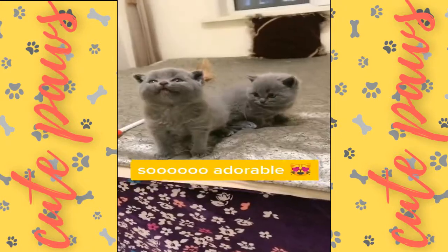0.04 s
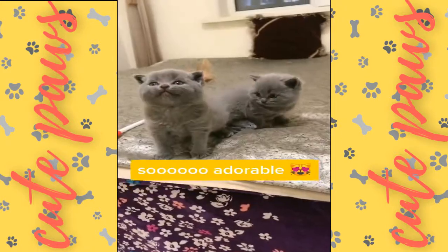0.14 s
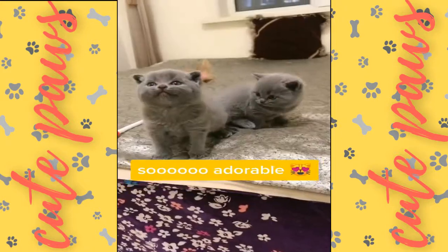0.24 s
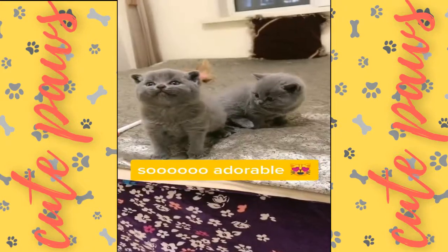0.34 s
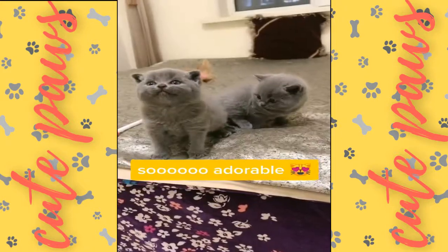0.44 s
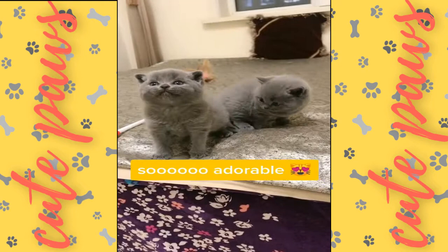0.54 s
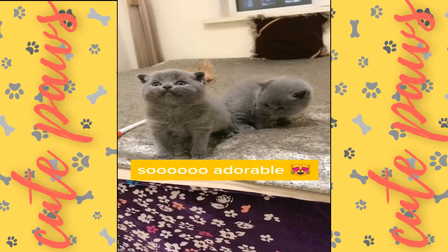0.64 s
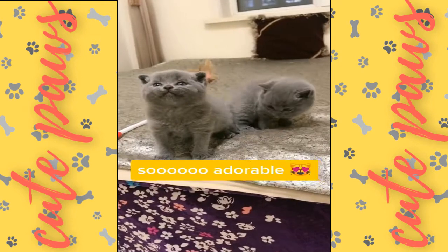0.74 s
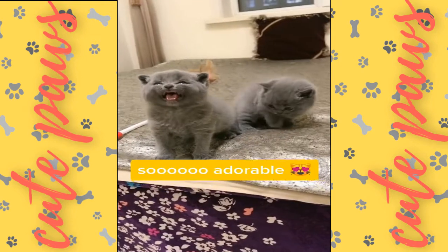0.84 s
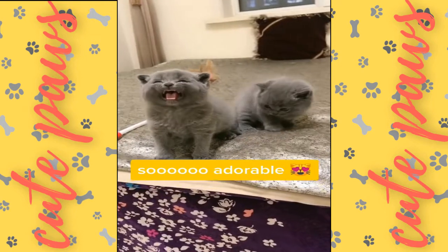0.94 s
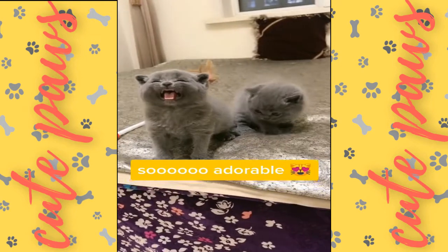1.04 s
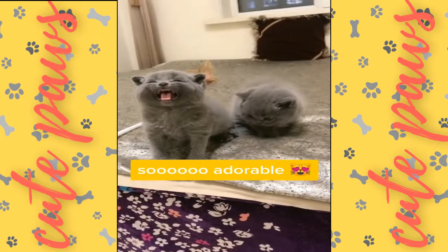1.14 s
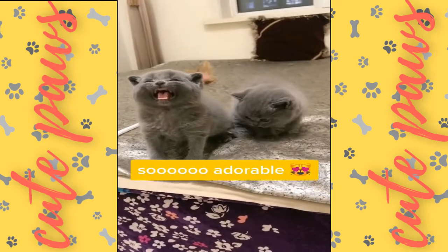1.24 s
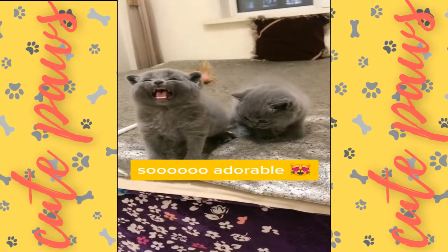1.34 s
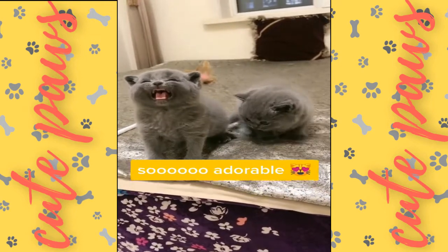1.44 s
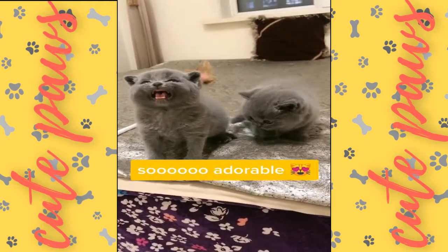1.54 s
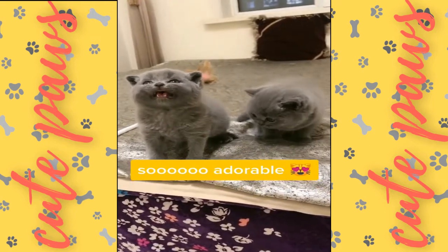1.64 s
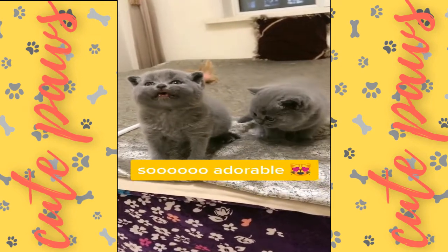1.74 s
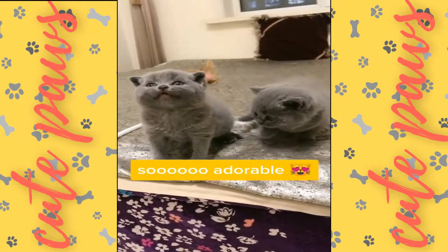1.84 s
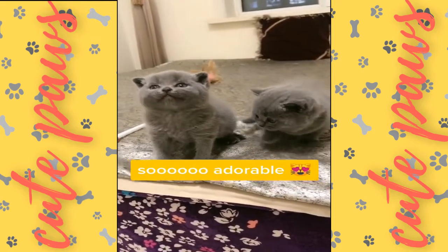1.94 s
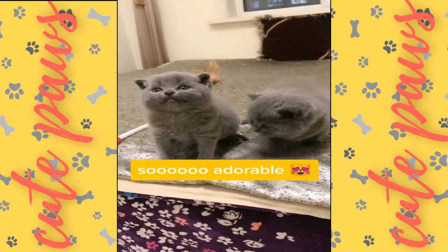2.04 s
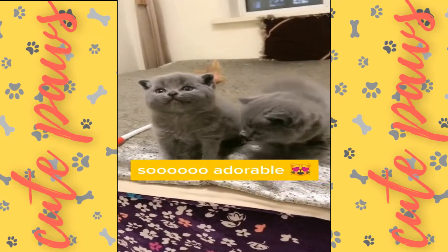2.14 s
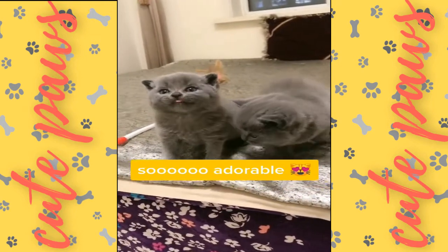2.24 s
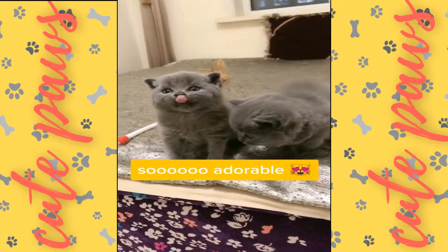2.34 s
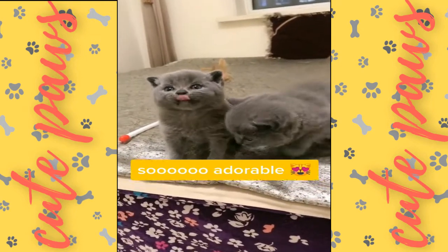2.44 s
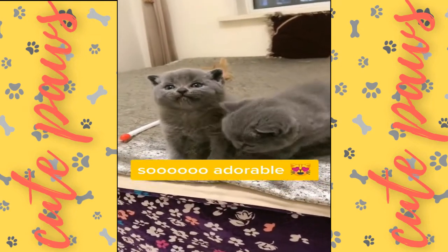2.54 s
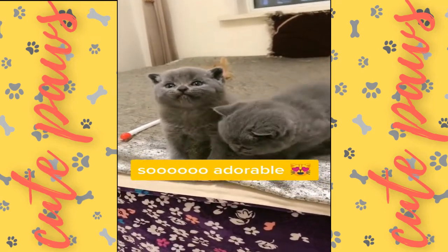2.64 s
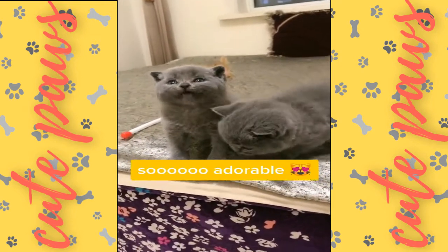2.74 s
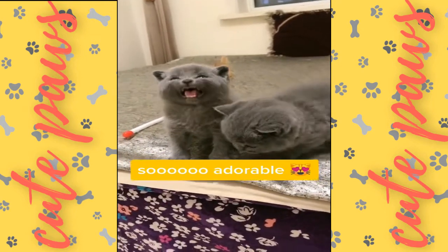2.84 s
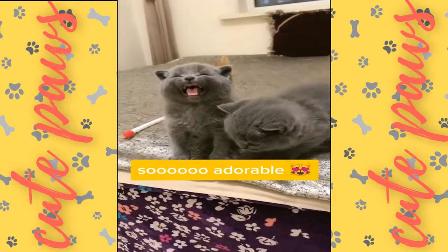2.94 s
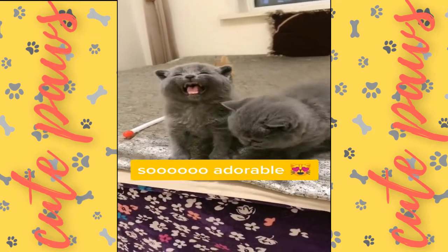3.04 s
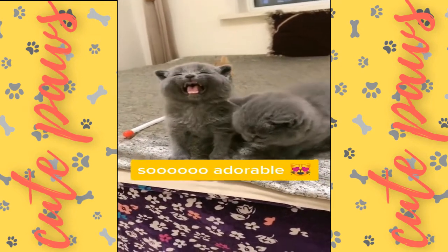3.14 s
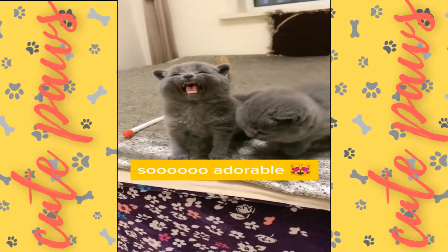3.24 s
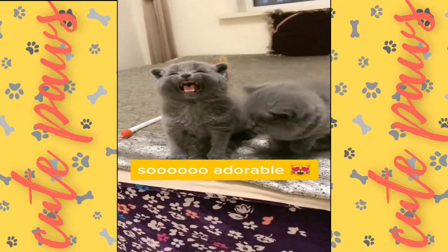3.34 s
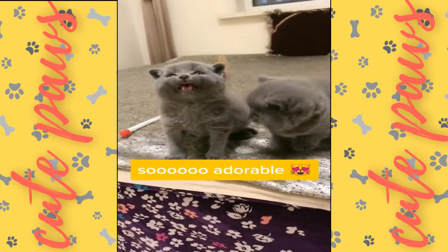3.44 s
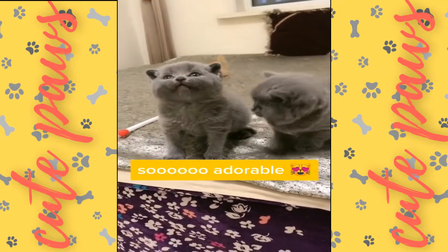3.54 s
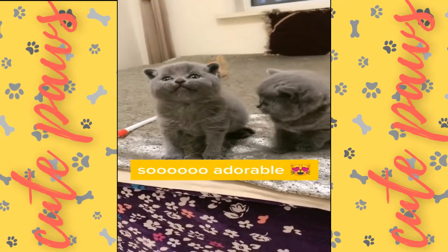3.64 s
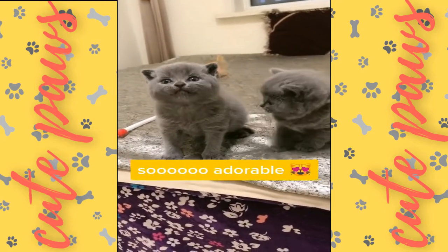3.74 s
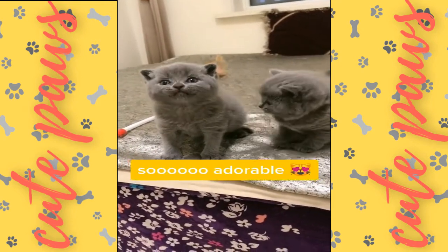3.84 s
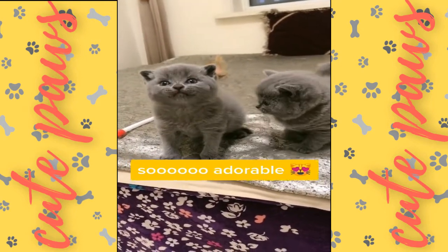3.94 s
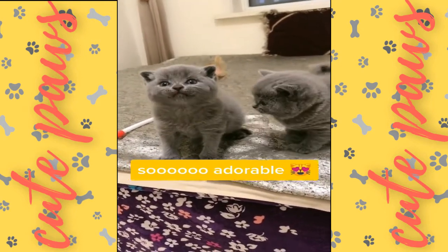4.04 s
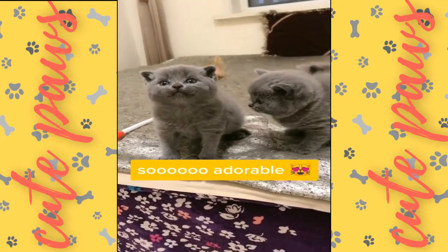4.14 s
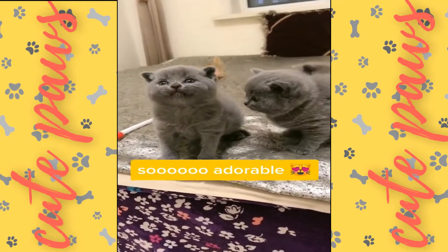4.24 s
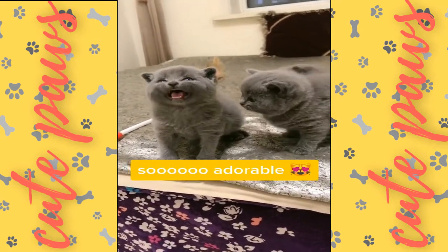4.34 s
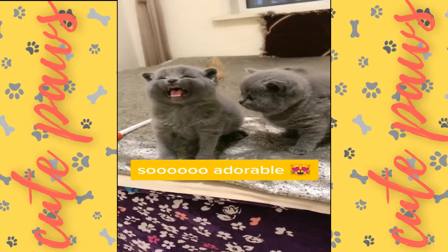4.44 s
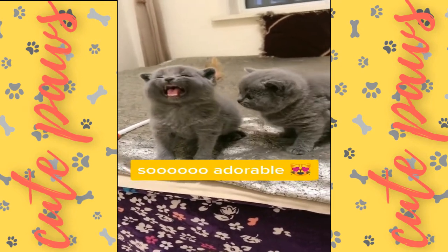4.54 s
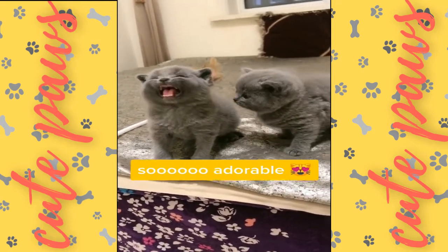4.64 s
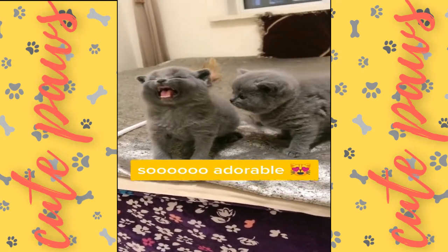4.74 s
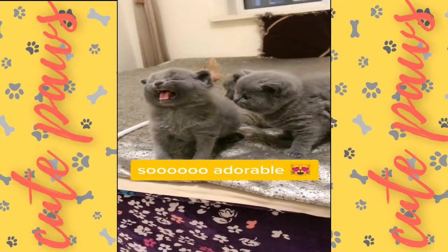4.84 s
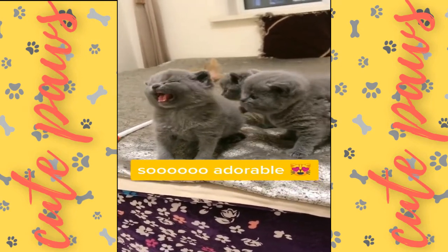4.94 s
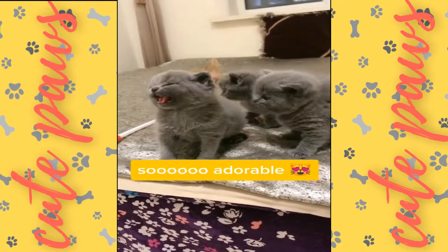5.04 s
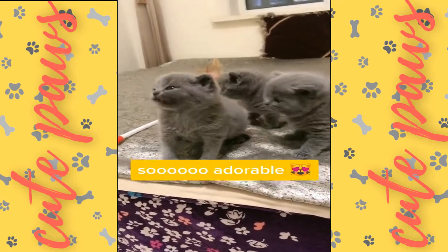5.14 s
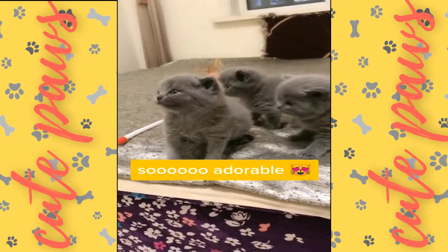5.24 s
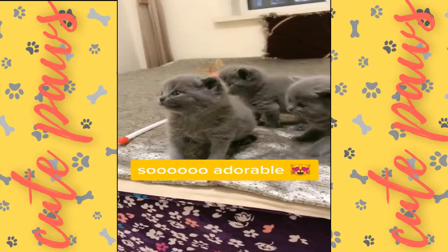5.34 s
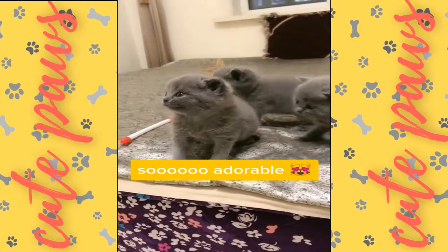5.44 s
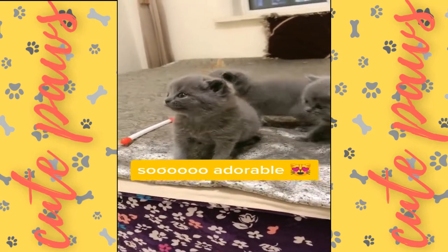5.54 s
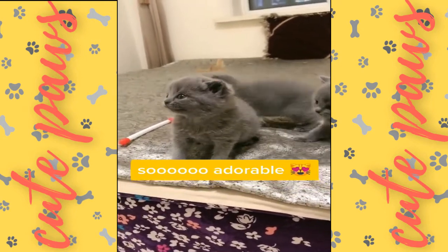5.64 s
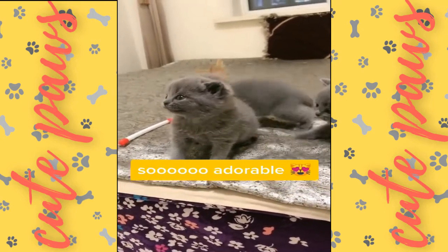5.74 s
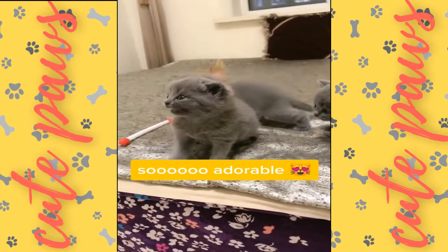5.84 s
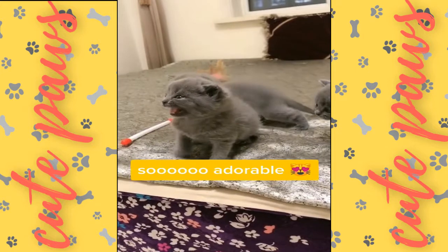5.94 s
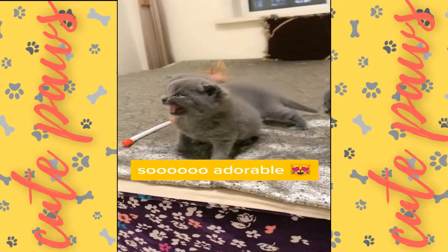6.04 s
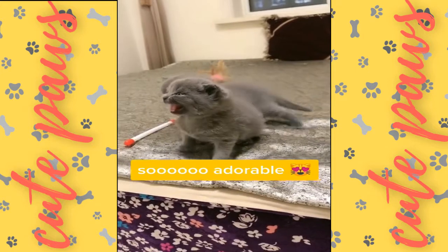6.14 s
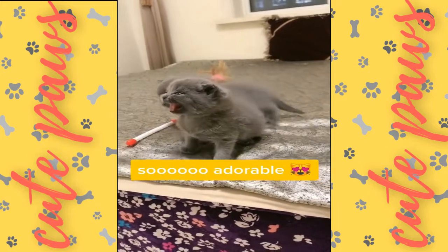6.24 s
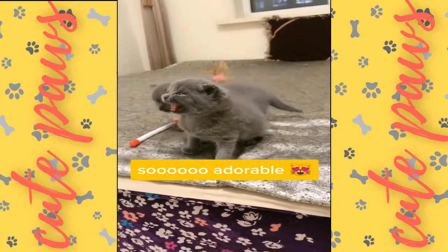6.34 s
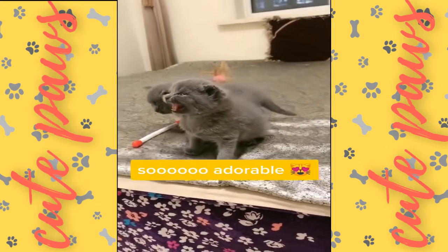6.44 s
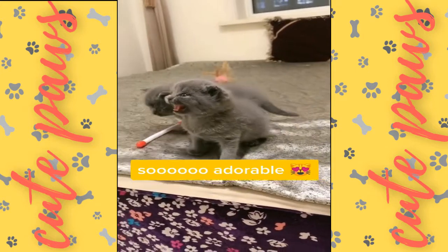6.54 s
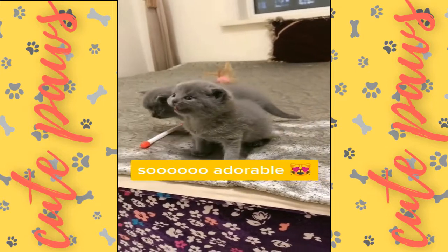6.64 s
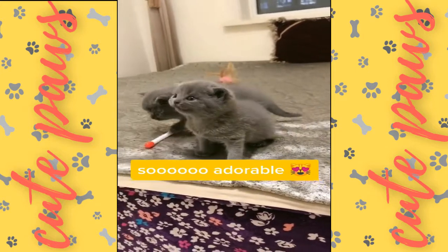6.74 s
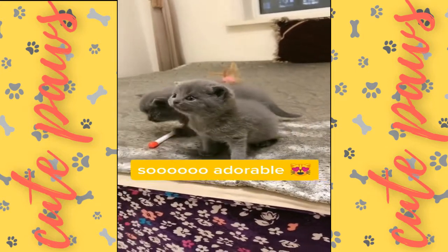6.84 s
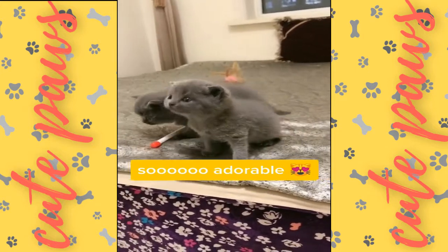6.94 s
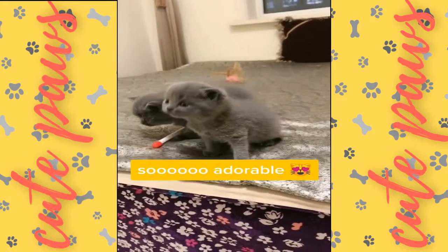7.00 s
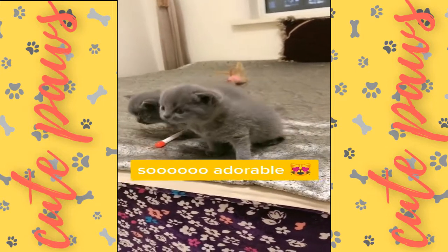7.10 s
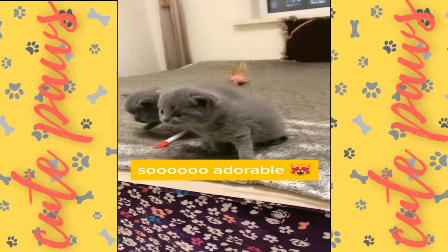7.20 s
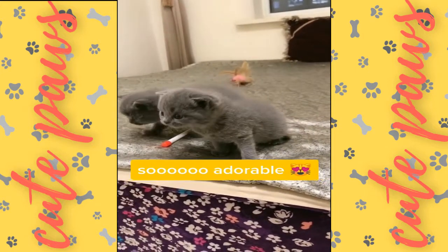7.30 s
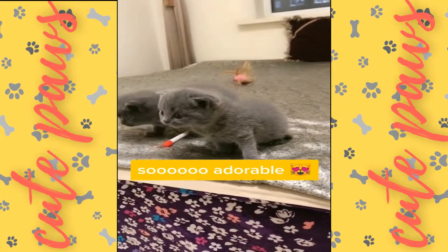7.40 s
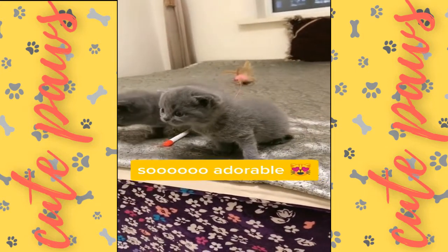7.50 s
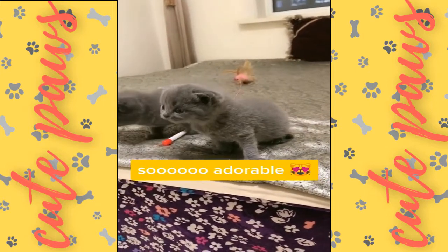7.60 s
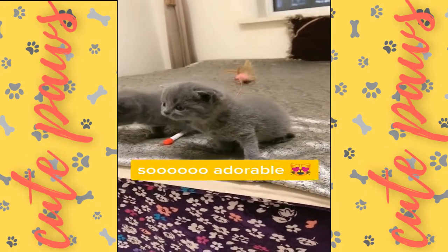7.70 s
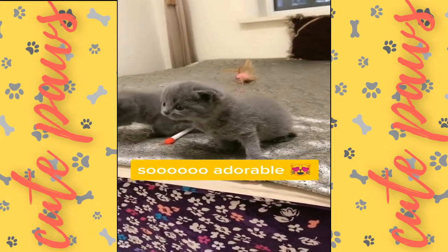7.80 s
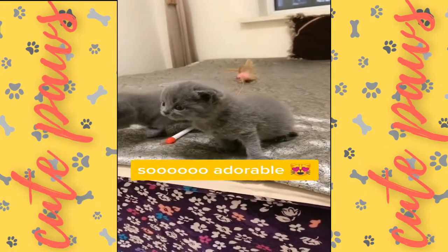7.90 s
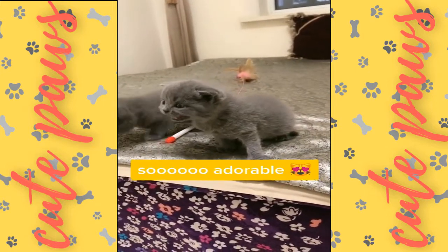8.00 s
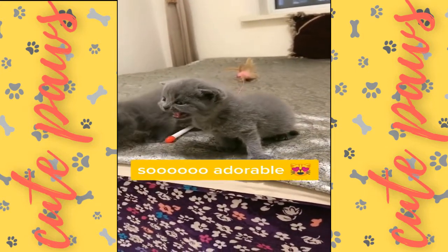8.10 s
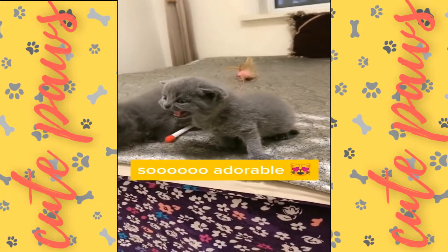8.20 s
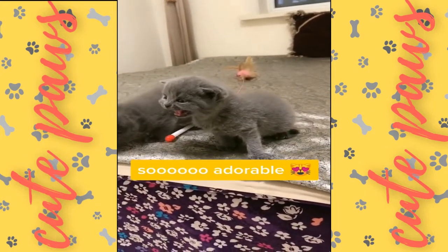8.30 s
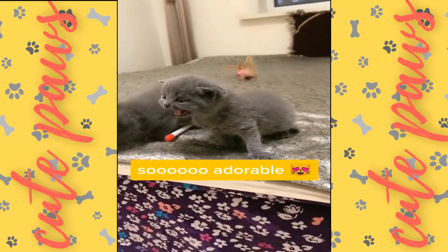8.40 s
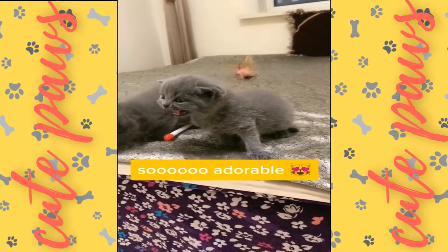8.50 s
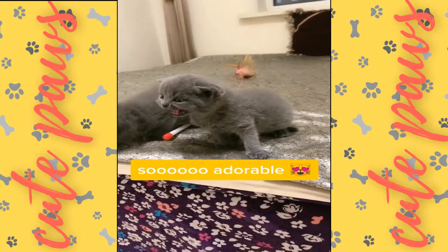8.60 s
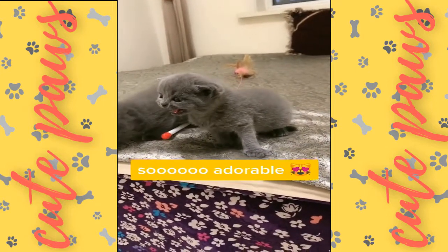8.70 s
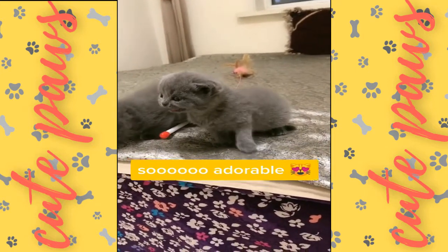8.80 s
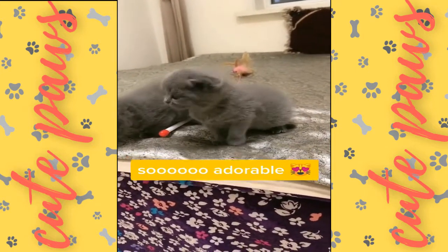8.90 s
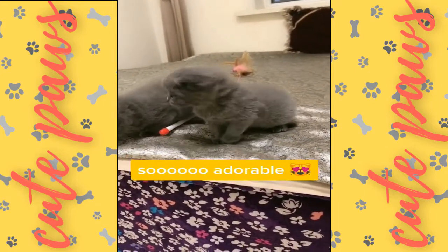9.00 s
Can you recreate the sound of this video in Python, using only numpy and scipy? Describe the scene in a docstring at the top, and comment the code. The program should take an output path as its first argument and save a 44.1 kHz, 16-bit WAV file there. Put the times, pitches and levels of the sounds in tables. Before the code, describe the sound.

A kitten gives five high meows that rise and fall, close by in a quiet room, with soft bumps and shuffling on a bed.

```python
"""Five close kitten meows in a small quiet room, after the tail of an earlier one.
The vocal folds sound a clean arch of pitch, raspy at the onset, through a mouth resonance that rises
and falls with the jaw. A second kitten mews faintly. The bed takes soft bumps, something is shuffled
about and fur brushes the blanket, over a low room rumble. A phone close by cuts the top treble."""
import sys
import numpy as np
from scipy import signal
from scipy.fft import rfft, irfft, next_fast_len
from scipy.io import wavfile
from scipy.ndimage import uniform_filter1d

SR = 44100
rng = np.random.default_rng(int(sys.argv[2]) if len(sys.argv) > 2 else 0)


def wav_record(signal):
    """Record a signal, one row per channel, as 16-bit PCM in the file named by sys.argv[1]."""
    frames = np.transpose(np.atleast_2d(signal))
    bounded = np.clip(frames, -1, 1)
    # unit amplitude maps onto the largest positive 16-bit level
    quanta = np.round(bounded * 32767).astype(np.int16)
    wavfile.write(sys.argv[1], SR, quanta)


N = 399571
SIZE = next_fast_len(N + SR // 2)  # lead-in, so the room already rings at 0 s
TIME = np.arange(N - SIZE, N) / SR
FREQS = np.fft.rfftfreq(SIZE, 1 / SR)
TOP_HZ = 13100


def undb(db):
    """Decibels to gain."""
    return 10 ** (np.asarray(db) / 20)


def unit(x):
    """Scale to rms 1."""
    return x / np.sqrt(np.mean(x ** 2))


def ramp(x):
    """Clip to 0..1."""
    return np.clip(x, 0, 1)


def share(gains):
    """Each harmonic's share of the total power."""
    return gains ** 2 / np.sum(gains ** 2, axis=0)


def colour(points, hz):
    """Gain of a (Hz, dB) spectrum at hz."""
    point_hz, db = np.transpose(points)
    return undb(np.interp(np.log(hz + 1), np.log(point_hz), db))


def resonance(hz, centre_hz, width_hz):
    """Gain of a steep resonance, 1 at its centre."""
    return 1 / (1 + ((hz ** 2 - centre_hz ** 2) / ((hz + 1) * width_hz)) ** 2)


def noise(gain):
    """Noise of rms 1, shaped by a gain at each of FREQS."""
    return unit(irfft(rfft(rng.standard_normal(SIZE)) * gain, SIZE))


def walk(rate_hz, size):
    """Smooth random drift, spread near 1."""
    hold = max(int(SR / rate_hz), 1)
    steps = np.repeat(rng.standard_normal(size // hold + 1), hold)
    return 1.4 * uniform_filter1d(uniform_filter1d(steps, hold), hold)[:size]


def swell(start_s, rise_s, decay_s):
    """Linear rise to 1, exponential decay."""
    age_s = np.maximum(TIME - start_s, 0)
    return np.minimum(age_s / rise_s, 1) * np.exp(-np.maximum(age_s - rise_s, 0) / decay_s)


def background(floor_db=-46.8):
    """Steady room rumble and hiss; the deepest rumble swells once."""
    # Each row: frequency in Hz, relative level in dB.
    floor_spectrum = [(13, -39), (22, -1), (48, -2), (91, -6), (112, -15), (143, -14.5), (181, -18),
                      (354, -23.5), (462, -27), (1000, -27.5), (2170, -31), (2550, -34), (3240, -33.5),
                      (8710, -38.5), (13000, -45.5)]
    # Start in seconds, level in dB, rise and decay in seconds.
    rumble_swell = (4.3, -43, 1.4, 1.2)
    start_s, db, rise_s, decay_s = rumble_swell
    rumble = undb(db) * swell(start_s, rise_s, decay_s) * noise(resonance(FREQS, 44, 14))
    return rumble + noise(colour(floor_spectrum, FREQS)) * undb(floor_db + 0.16 * walk(2.94, SIZE))


def echoes(x, t60_s, gap_s=0.0046):
    """Reflections off the room's surfaces: sparse, then dense."""
    t = np.arange(SR // 2) / SR
    density = ramp(.02 + (t / .05) ** 2)
    taps = rng.standard_normal(len(t)) * (rng.random(len(t)) < density) / np.sqrt(density)
    response = taps * (t > gap_s) * np.exp(-np.log(1000) * t / t60_s)
    return signal.fftconvolve(x, response / np.linalg.norm(response))[:SIZE]


def fur_brushes():
    """Fur rubs the blanket in short hisses."""
    # Each row: frequency in Hz, relative level in dB.
    fur_spectrum = [(290, -47), (500, -17), (732, -8), (806, -29), (1230, 0), (4430, 7), (7040, 2),
                    (13000, -22)]
    # Each row: start in seconds, level in dB, rise and decay in seconds.
    strokes = [(1.861, -44, 0.024, 0.048), (8.91, -43, 0.071, 0.12)]
    hiss = noise(colour(fur_spectrum, FREQS))
    return sum(undb(db) * swell(start_s, *shape_s) * hiss for start_s, db, *shape_s in strokes)


def shuffles(grain_db=0.5, boom_lag_s=0.0083, boom_rise_s=0.087, boom_decay_s=0.1):
    """Something is shuffled about: grainy scrapes, each with a slower hollow boom."""
    # Each row: start in seconds, scrape level in dB, its rise and decay in seconds, boom level in dB.
    moves = [(2.78, -43.5, 0.026, 0.033, -44.5), (3.55, -61, .05, 0.093, -47.5),
             (6.37, -41.5, 0.0067, 0.19, -36.5), (6.884, -30.5, 0.043, 0.082, -31),
             (7.08, -49.5, 0.015, 0.17, -43), (7.288, -42.5, 0.024, 0.11, -40.5),
             (7.588, -40, 0.03, 0.11, -33)]
    # Each row: frequency in Hz, relative level in dB.
    scrape_spectrum = [(210, -21), (350, 4), (439, -5.5), (488, -5.5), (723, -3.5), (979, -4.5), (1100, -1),
                       (3090, -9.5), (7320, -21), (13000, -34.5)]
    # Each row: centre in Hz, width in Hz, relative level in dB.
    boom_modes = [(87.7, 11.5, 8.5), (150, 27, 5), (194.5, 38, -12.5), (238, 78, -9), (295, 26, -4.5),
                  (352, 160, -20.5)]
    scrape = unit(noise(colour(scrape_spectrum, FREQS)) * undb(grain_db * walk(310, SIZE)))
    boom = noise(sum(undb(db) * resonance(FREQS, hz, width_hz) for hz, width_hz, db in boom_modes))
    out = np.zeros(SIZE)
    for start_s, scrape_db, rise_s, decay_s, boom_db in moves:
        out += undb(scrape_db) * swell(start_s, rise_s, decay_s) * scrape
        out += undb(boom_db) * swell(start_s + boom_lag_s, boom_rise_s, boom_decay_s) * boom
    return out


def bed_bumps(rise_cycles=1.9, decay_cycles=7, thud_db=-15.5):
    """Each bump swings the mattress at a low, unsteady pitch, with a dull thud on top."""
    # Each row: start in seconds, level in dB, pitch in Hz.
    bumps = [(.08, -47, 45), (.905, -21.5, 72), (1.11, -35.5, 48), (1.21, -42, 130), (2.8, -41, 85),
             (3.56, -38.5, 75), (4.41, -30.5, 66), (4.871, -43, 75), (6.64, -36, 45)]
    thud = undb(thud_db) * noise(resonance(FREQS, 118, 66))
    out = np.zeros(SIZE)
    for start_s, db, hz in bumps:
        phase = 2 * np.pi * hz * np.cumsum(1 + .13 * walk(60, SIZE)) / SR
        envelope = undb(db) * swell(start_s, rise_cycles / hz, decay_cycles / hz)
        out += envelope * (np.sqrt(2) * np.sin(phase) + thud)
    return out


def faint_mews(fade_s=0.0059):
    """Second kitten: thin calls of nearly level pitch through an almost closed mouth."""
    # One list per mew. Each row: time in seconds, pitch in Hz, relative level in dB, mouth in Hz.
    contours = [
        [(4.02, 860, -70, 1490), (4.08, 885, -51.5, 1600), (4.14, 860, -55.5, 1600), (4.22, 795, -54, 1400)],
        [(5.57, 735, -70, 3400), (5.62, 770.5, -48, 3740), (5.68, 753, -51, 3550), (5.76, 717, -48, 3000),
         (5.9, 732, -59, 1500), (6.15, 698, -53, 1200)],
    ]
    # Each row: frequency in Hz, relative level in dB.
    mew_spectrum = [(700, 3.5), (1600, 5), (2500, -4), (3700, 1), (5500, -10), (9000, -12)]
    harmonic = np.arange(1, 11)[:, None]
    out = np.zeros(SIZE)
    for contour in contours:
        times_s, *columns = np.transpose(contour)
        span = (TIME >= times_s[0]) & (TIME < times_s[-1])
        t = TIME[span]
        pitch_hz, db, mouth_hz = [uniform_filter1d(np.interp(t, times_s, c), 500) for c in columns]
        phase = 2 * np.pi * np.cumsum(pitch_hz * (1 + 0.0023 * walk(60, len(t)))) / SR
        hz = harmonic * pitch_hz
        power = share(colour(mew_spectrum, hz) * (0.34 + resonance(hz, mouth_hz, 1600)))
        fade = ramp(np.minimum(t - t[0], t[-1] - t) / fade_s)
        out[span] += fade * undb(db) * np.sum(np.sqrt(2 * power) * np.sin(harmonic * phase), axis=0)
    return out


def pitch_arch(age_s, length_s, top_hz, climb_s, sag_hz_per_s, drop_hz, drop_s, wobble_hz, period_s,
               start_hz=500, round_s=0.186, crest_s=0.3):
    """Meow pitch in Hz: climbs, rounds into a sag, drops as the air runs out; wobbles throughout."""
    below_top = (top_hz - start_hz) * ramp(1 - age_s / climb_s) ** 2.845
    sag = sag_hz_per_s * (np.hypot(np.maximum(age_s - climb_s, 0), round_s) - round_s)
    drop = drop_hz * np.exp((age_s - length_s) / drop_s)
    wobble = wobble_hz * np.cos(2 * np.pi * (age_s - crest_s) / period_s)
    return top_hz + wobble - below_top - sag - drop


def fold_phase(pitch_hz, unsettled, slack):
    """Vocal fold phase: a slight waver, plus jitter while unsettled or slack."""
    size = len(pitch_hz)
    waver = .0017 * walk(45, size) + .0007 * walk(450, size)
    jitter = (.011 * unsettled + .014 * slack) * walk(600, size)
    return 2 * np.pi * np.cumsum(pitch_hz * (1 + waver + jitter)) / SR


def jaw(open_hz, weak, held_s, pitch_hz, past_top,
        opening_hz=350, ease_hz_per_s=640, closing_pitch_hz=931, shut_hz=2100):
    """Mouth resonance in Hz: the jaw opens in the attack, eases back, shuts as the pitch falls."""
    shut = past_top / (1 + np.exp((pitch_hz - closing_pitch_hz) / 60))
    return (1 - shut) * (open_hz - opening_hz * weak - ease_hz_per_s * held_s) + shut * shut_hz


def meow(row, onset_s=0.2, slack_hz=1040, flare_db=3, flare_width_s=0.05, overtone_attack_s=0.088,
         upper_hz=6200, shimmer_db=4.5, rasp_db=-34, hoarse_db=-33, hoarse_hz=4250):
    """Vocal folds drive harmonics through throat and mouth; they rasp at the onset and when slack."""
    # Each row of both: frequency in Hz, relative level in dB.
    overtone_spectrum = [(4500, -22), (5300, 2), (6000, 4.5), (7000, 3), (8000, 5.5), (8900, -1.5),
                         (9900, 3.5), (10900, -5.5), (11900, -3), (13000, -24)]
    rasp_spectrum = [(800, -26.5), (2000, -13.5), (2800, -15), (4200, 1.5), (6000, -4), (8000, -3),
                     (9500, -12.5), (13000, -21)]
    start_s, length_s, top_hz, climb_s, *arch_shape = row[:9]
    level_db, fade_db_per_s, flare_s, slack_db, open_hz, bright_db, beam_db = row[9:]
    span = (TIME >= start_s) & (TIME < start_s + length_s)
    age_s = TIME[span] - start_s
    size = len(age_s)
    pitch_hz = pitch_arch(age_s, length_s, top_hz, climb_s, *arch_shape)
    unsettled = np.exp(-(age_s / onset_s) ** 4)
    slack = ramp((slack_hz - pitch_hz) / 250) * (1 - unsettled)
    phase = fold_phase(pitch_hz, unsettled, slack)

    # The meow swells, overtones first, and its mouth band flares briefly twice.
    attack_s = 0.56 * climb_s
    weak = ramp(1 - age_s / attack_s)
    held_s = np.maximum(age_s - attack_s, 0)
    flares = sum(np.exp(-((age_s - at_s) / flare_width_s) ** 2) for at_s in (0.65 * climb_s, flare_s))
    loss_db = slack_db * slack
    mouth_db = level_db + flare_db * flares - 27 * weak - fade_db_per_s * held_s - loss_db
    throat_db = -28.7 - 15.5 * weak - loss_db
    overtone_db = bright_db - 20 * ramp(1 - age_s / overtone_attack_s) - 5 * held_s - loss_db

    harmonic = np.arange(1, 21)[:, None]
    hz = harmonic * np.diff(phase, prepend=0) * SR / (2 * np.pi)
    mouth_hz = jaw(open_hz, weak, held_s, pitch_hz, past_top=age_s > climb_s)
    mouth = resonance(hz, mouth_hz, 770) / (1 + (2550 / hz) ** 12)
    throat = resonance(hz, 1560, 1300) / (1 + (hz / 2900) ** 12)
    upper = (0.24 + resonance(hz, upper_hz, 1900)) / (1 + (4700 / hz) ** 12)
    shimmer = undb(shimmer_db * np.array([walk(23.04, size) for _ in harmonic]))
    beam = [(7500, 0), (10000, beam_db)]
    overtones = upper * colour(overtone_spectrum, hz) * colour(beam, hz) * shimmer * (hz < TOP_HZ)
    bands = [(mouth_db, mouth), (throat_db, throat), (overtone_db, overtones)]
    gains = np.sqrt(sum(undb(db) ** 2 * share(band) for db, band in bands))
    gains[0] = undb(.5 * mouth_db - 33)  # the fundamental swells less than the mouth band
    air_flutter = undb(1.6 * walk(55, size))
    voice = air_flutter * np.sqrt(2) * np.sum(gains * np.sin(harmonic * phase), axis=0)

    # Air hisses through the folds once a cycle and rings the open mouth.
    leak = undb(rasp_db) + undb(-3) * unsettled + undb(-2.5) * slack
    rasp = noise(colour(rasp_spectrum, FREQS) * colour(beam, FREQS))[span] * undb(overtone_db) * leak
    hoarse_gain = undb(mouth_db + hoarse_db) * resonance(hoarse_hz, mouth_hz, 1400)
    hoarse = noise(resonance(FREQS, hoarse_hz, 840) ** 2)[span] * hoarse_gain
    fade = ramp(age_s / 0.035) * ramp((length_s - age_s) / 0.045)
    out = np.zeros(SIZE)
    out[span] = fade * (voice + (rasp + hoarse) * (1 + np.cos(phase)))
    return out


def close_meows():
    """The near kitten's calls; the first starts before 0 s."""
    # Each row: start and length in seconds, top pitch in Hz, climb in seconds, sag in Hz/s, final drop
    # in Hz, its time constant in seconds, wobble in Hz, its period in seconds, level in dB, fade in
    # dB/s, second flare in seconds from the start, loss when slack in dB, open mouth resonance in Hz,
    # overtone level in dB, treble beamed at the phone in dB.
    calls = [ (-0.85, 0.94, 1170, 0.33, 600, 430, 0.09, 5, 0.2, -21, 13, 0.6, 14, 4100, -35, 4),
             (0.711, 1.2, 1166, 0.298, 639, 56, 0.091, 3, 0.14, -21.3, 12, 1.14, 12, 4050, -35, 6),
             (2.684, 0.9, 1136, 0.338, 781, 302, 0.119, 10, 0.2, -21, 13, 0.56, 11, 4200, -34.3, 1.5),
             (4.224, 0.96, 1178, 0.335, 589, 473, 0.069, 7, 0.18, -19, 14, 0.72, 13.5, 4260, -33.5, 1.3),
             (5.78, 0.985, 1219, 0.373, 789, 494, 0.082, 10, 0.25, -20.3, 12, 0.52, 16, 4100, -32.3, -2.5),
             (7.884, 0.961, 1180, 0.308, 427, 471, 0.132, 4, 0.25, -18.7, 12, 0.74, 9, 3560, -42, -4.5), ]
    return sum(map(meow, calls))


def scene(mews_db=-2, room_db=-4, scatter_db=-10.7, scatter_hz=6100):
    """Kittens, bed and room in stereo; only the high treble differs between left and right."""
    kittens = close_meows() + undb(mews_db) * faint_mews()
    reverb = undb(room_db) * echoes(kittens, t60_s=0.34)
    mid = kittens + reverb + bed_bumps() + shuffles() + fur_brushes() + background()
    # Nearby surfaces scatter short waves differently to each microphone.
    highpass = signal.butter(10, scatter_hz, "high", fs=SR, output="sos")
    side = undb(scatter_db) * signal.sosfilt(highpass, echoes(mid, t60_s=0.029))
    return np.array([mid + side, mid - side])[:, -N:]


def record(dry):
    """The phone's steep low-pass."""
    return signal.sosfilt(signal.ellip(10, .2, 80, TOP_HZ, fs=SR, output="sos"), dry)


dry = scene()
out = record(dry)
wav_record(out)
```